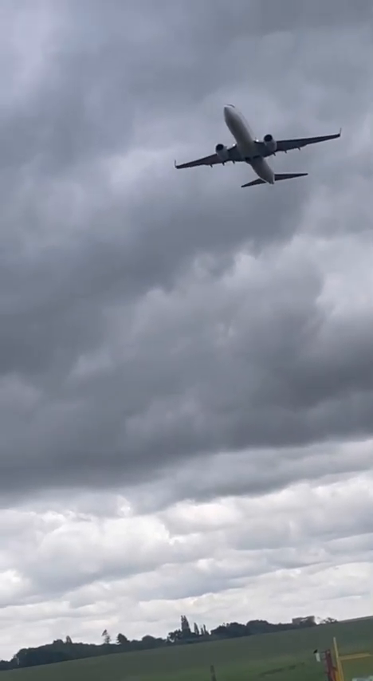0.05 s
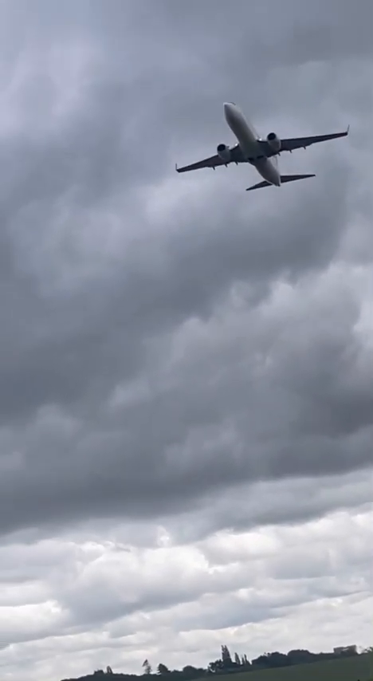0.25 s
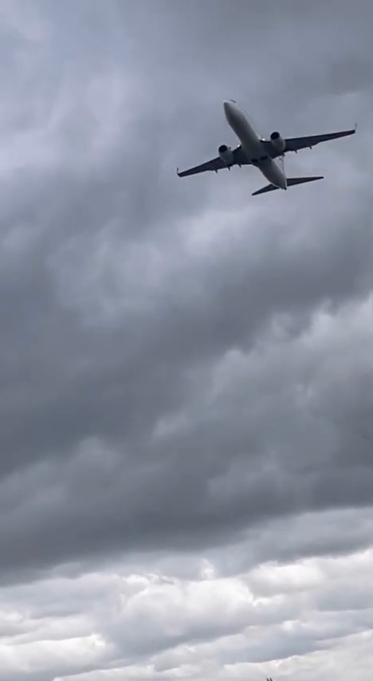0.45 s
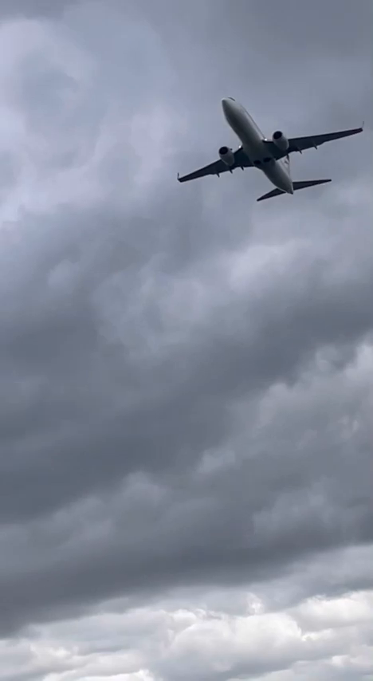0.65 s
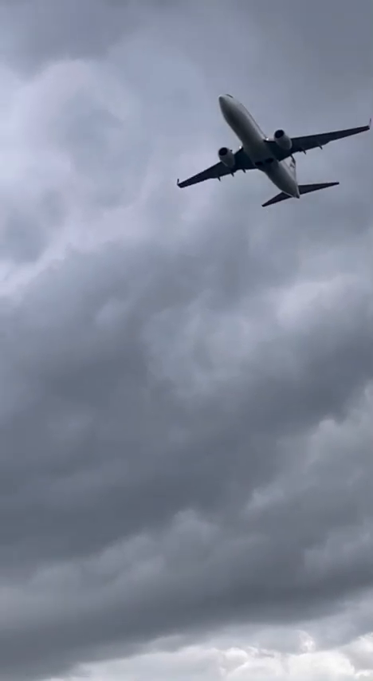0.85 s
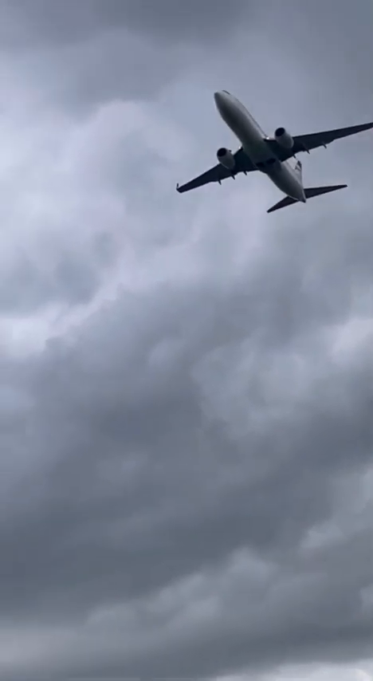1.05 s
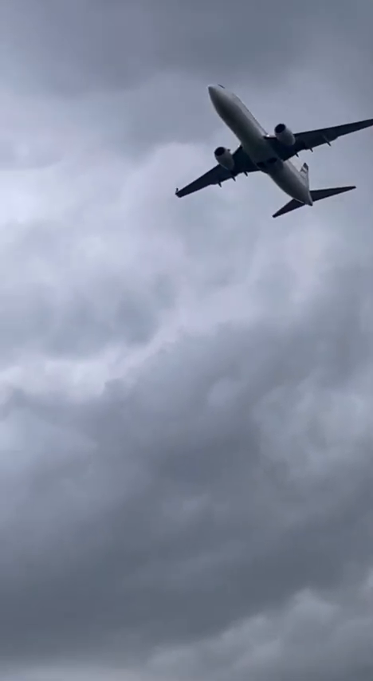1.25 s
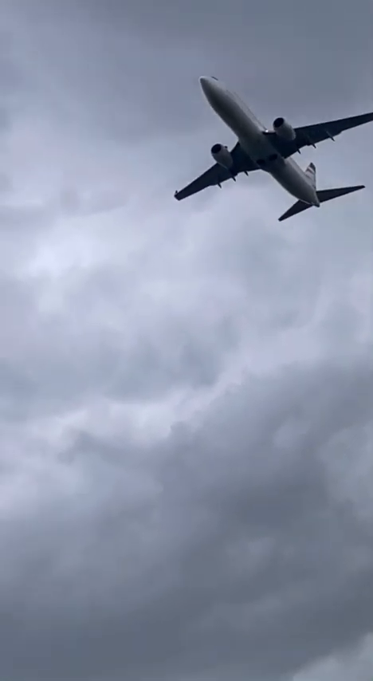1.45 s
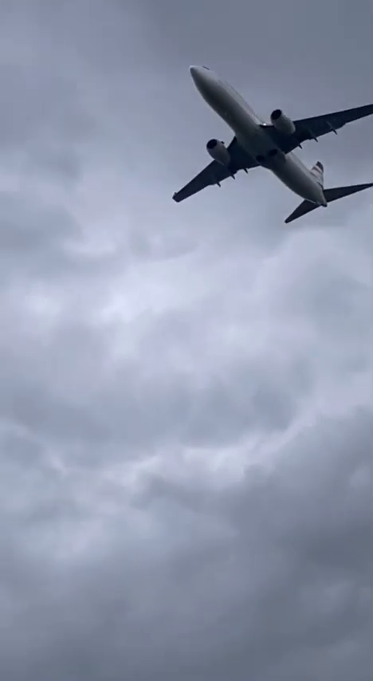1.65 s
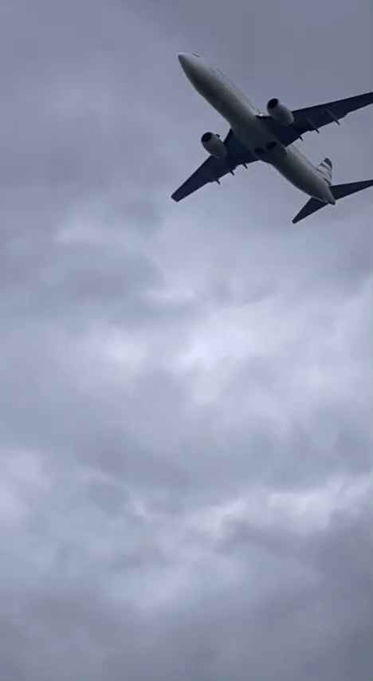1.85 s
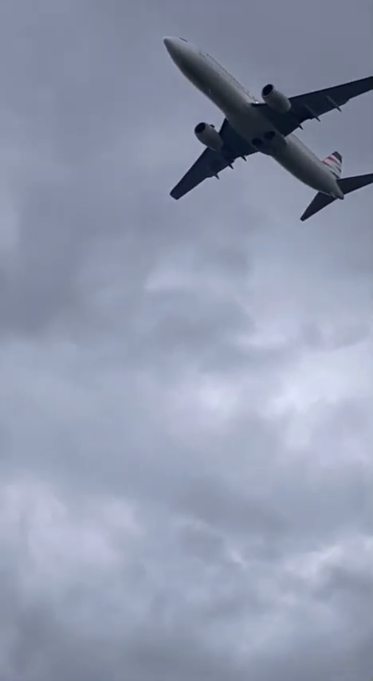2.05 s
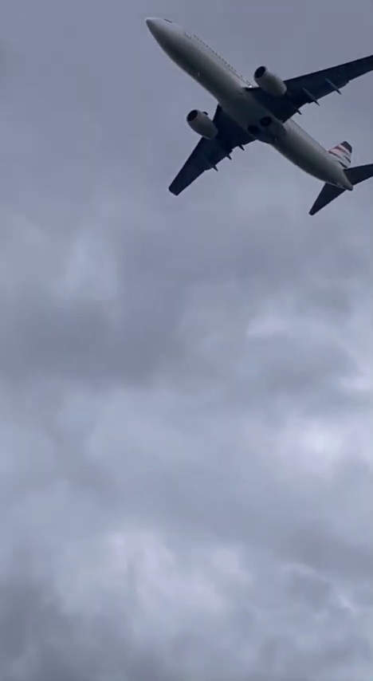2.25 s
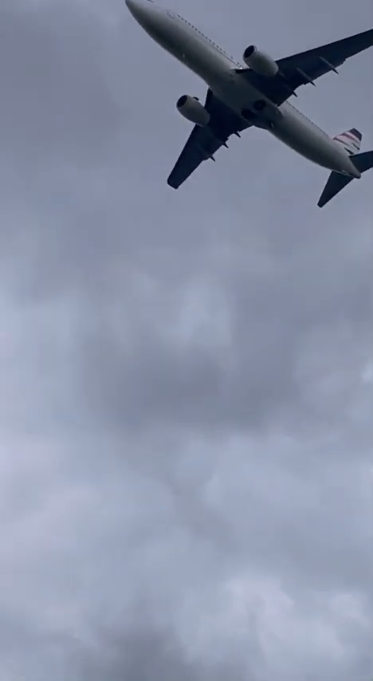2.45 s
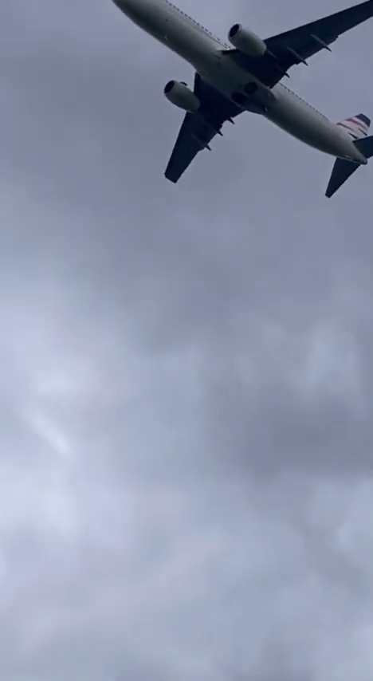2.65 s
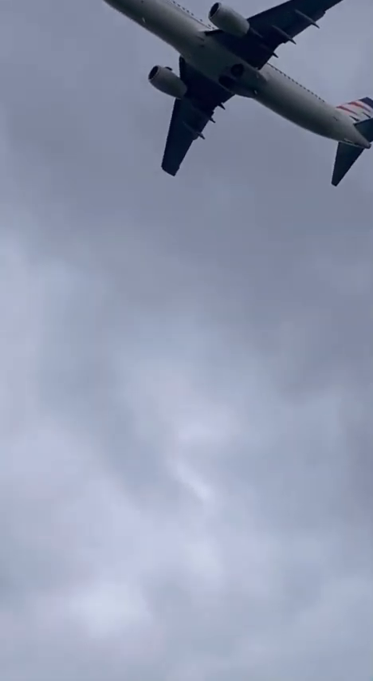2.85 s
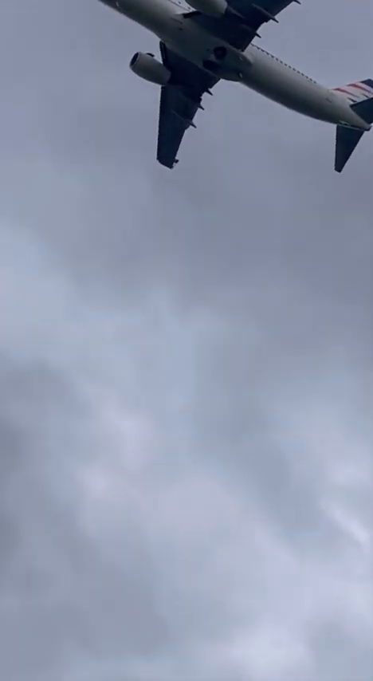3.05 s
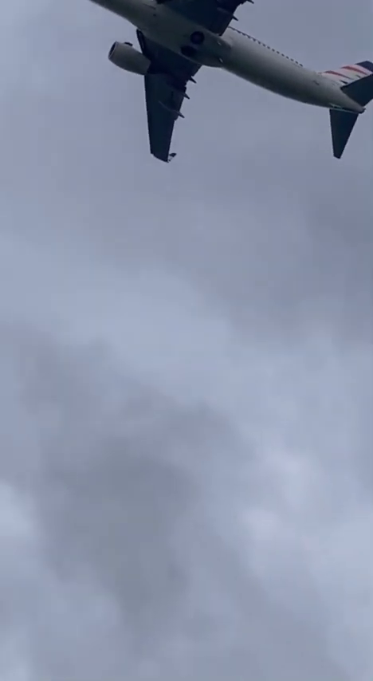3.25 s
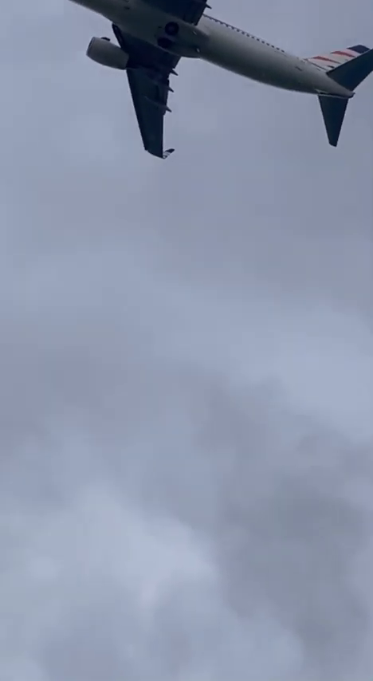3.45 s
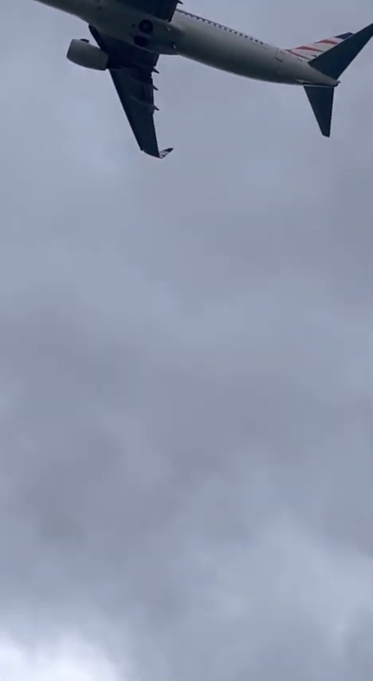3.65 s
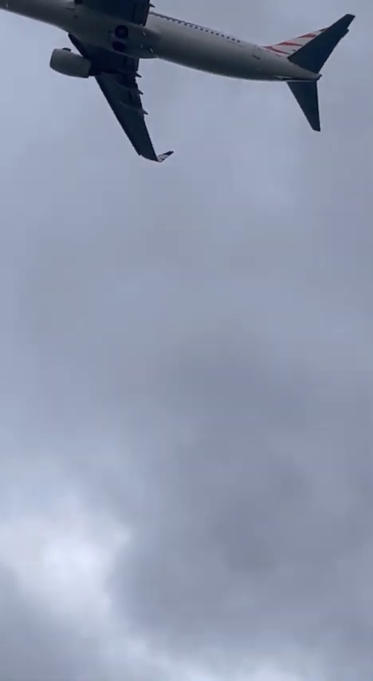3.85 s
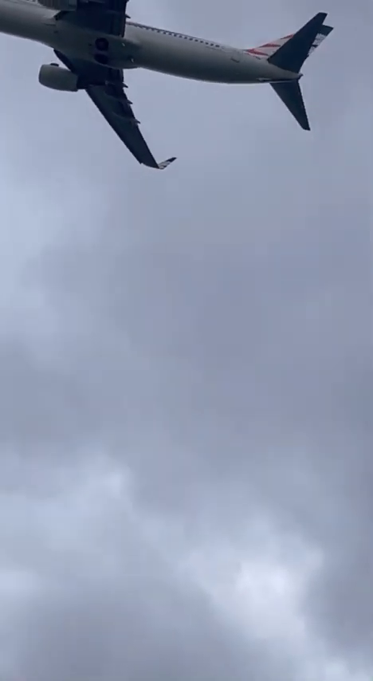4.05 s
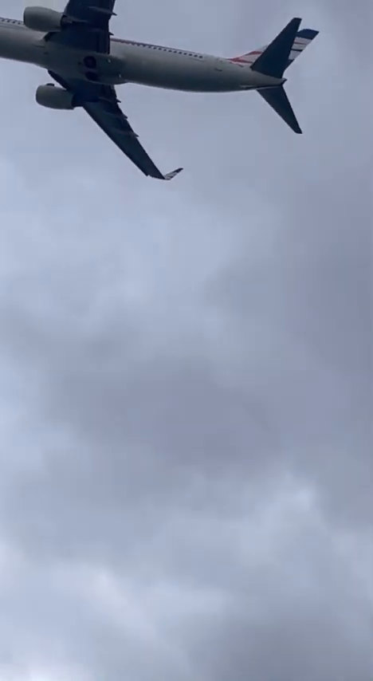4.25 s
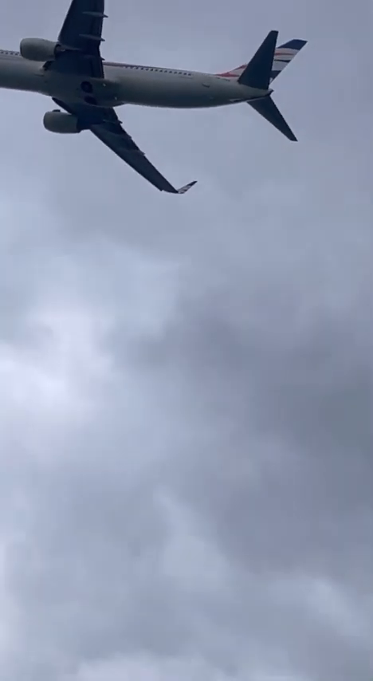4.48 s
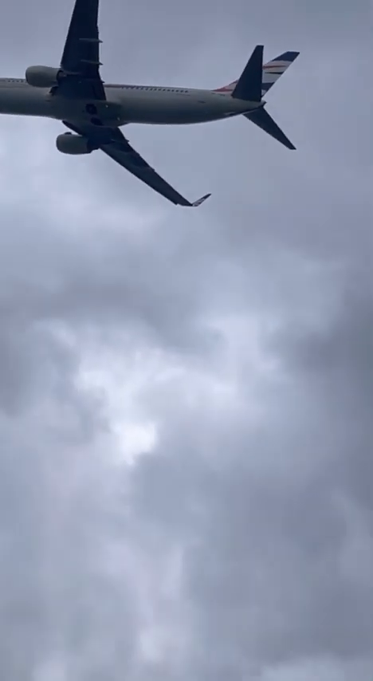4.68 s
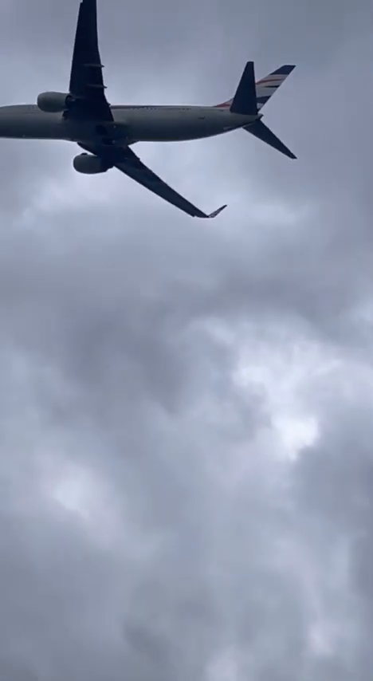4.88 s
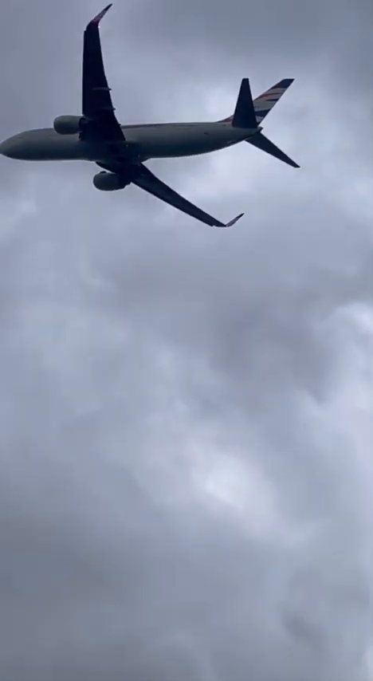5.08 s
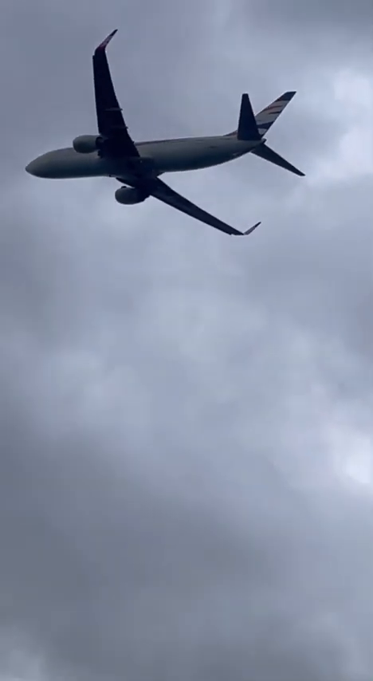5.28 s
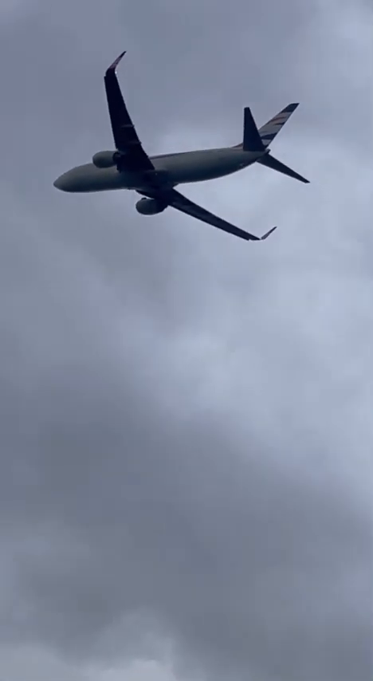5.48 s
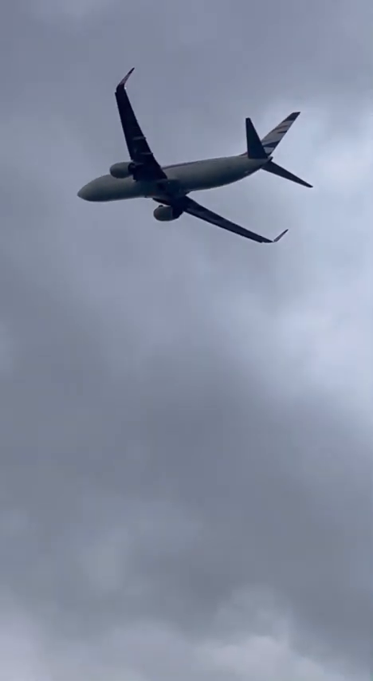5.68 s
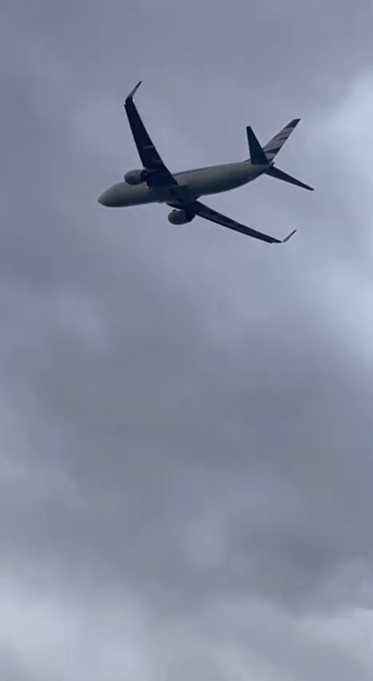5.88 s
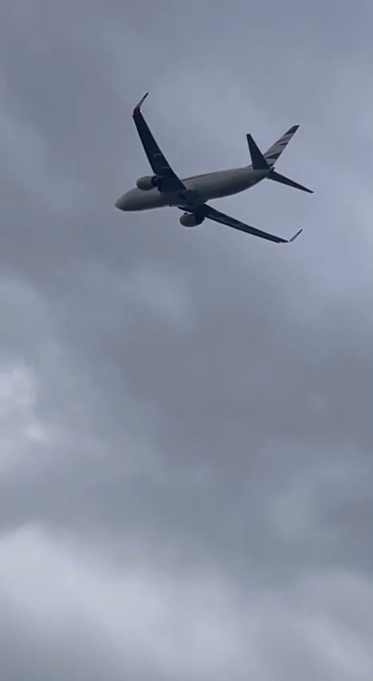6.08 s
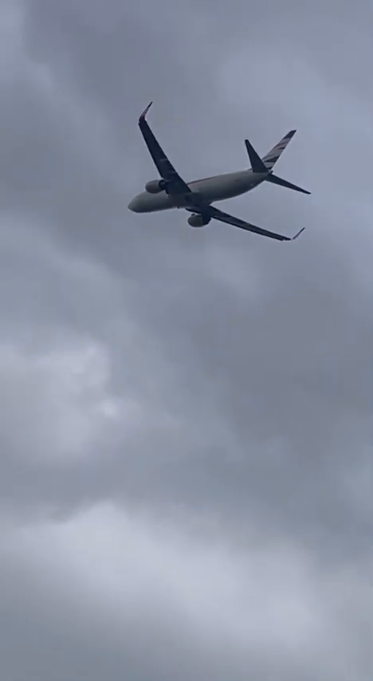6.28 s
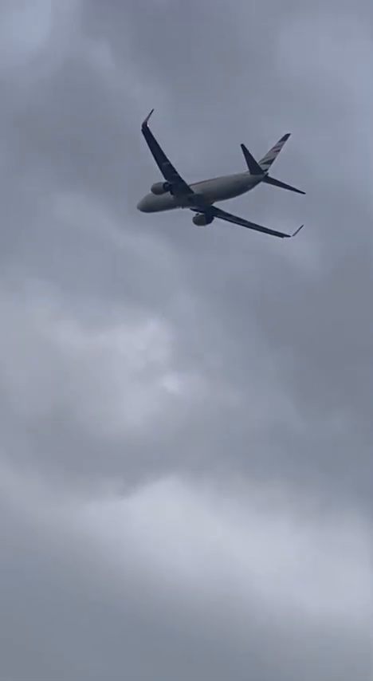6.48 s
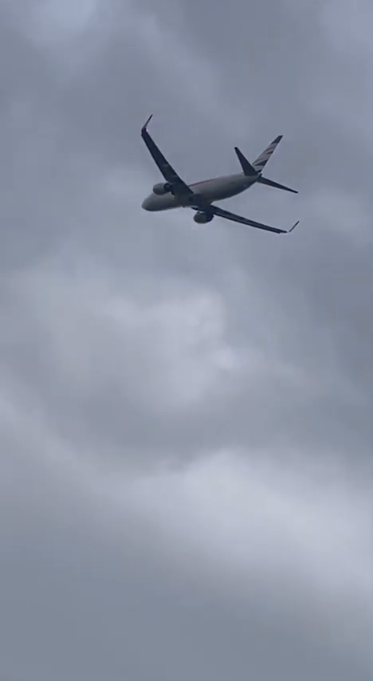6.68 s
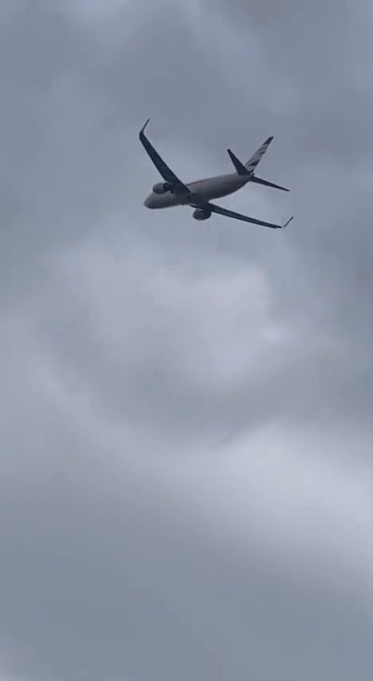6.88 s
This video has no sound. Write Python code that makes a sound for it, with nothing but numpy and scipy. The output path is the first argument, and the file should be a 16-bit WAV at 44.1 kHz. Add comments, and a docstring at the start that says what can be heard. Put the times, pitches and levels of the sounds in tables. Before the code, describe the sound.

Outdoors, a jet passes close above: raspy fan buzz and whine, then broad deepening roar and fluttering hiss, amid gusty wind thumps.

```python
"""Outdoors over grass: a twin-engine jet airliner climbs past low, heard by a small two-port microphone.
Fan tones (sines on shaft-speed multiples) fall in pitch as it passes; roar, rush and hiss are shaped noise.
The delayed ground echo sweeps a comb through the sound; turbulent air makes the treble swell and sink.
Wind noise buffets the ports, short thuds hit the microphone, two faint sliding whistles rise late on."""
import sys
import numpy as np
from scipy import signal
from scipy.fft import rfft, irfft, next_fast_len
from scipy.io import wavfile
from scipy.ndimage import uniform_filter1d, minimum_filter1d, map_coordinates

SR = 44100
rng = np.random.default_rng(int(sys.argv[2]) if len(sys.argv) > 2 else 0)


def unload_wav(signal):
    """Save mono or channel-first audio to the path in sys.argv[1] as 16-bit WAV at rate SR, clipped to [-1, 1]."""
    wavfile.write(
        sys.argv[1],
        SR,
        np.round(np.clip(np.atleast_2d(signal).T, -1, 1) * 32767).astype(np.int16),
    )


N = 305163
TIME_S = np.arange(N) / SR

# wind gusts on the ports: time_s, level_db
GUST_LEVEL = [(0, -35.5), (.36, -33.5), (1.17, -26.5), (1.45, -35), (2.09, -56), (2.5, -33.5), (3.1, -38.5),
              (3.47, -21.5), (4, -27.5), (4.4, -38.5), (5, -24), (5.3, -24), (5.76, -38), (6.07, -29),
              (6.92, -62.5)]
# wind spectrum: freq_hz, relative_density_db
WIND_SPECTRUM = [(30, -54), (70, -1.5), (130, -4), (250, -2.5), (500, -6), (900, -16), (2000, -67)]
# thuds of air on the microphone: middle_s, peak_db, pitch_hz, length_cycles
AIR_THUDS = [(.536, -14, 784, 3.8), (1.363, -11, 409, 5.8), (1.409, -5, 138, 0.76), (5.993, -17, 723, 5.6),
             (5.996, -10.5, 248, 2.1), (6.082, -10.5, 900, 0.89)]
# faint rising whistles: start_s, length_s, from_hz, to_hz, peak_db
RISING_CHIRPS = [(5.81, .075, 2500, 2980, -41), (5.845, .055, 3880, 4050, -47)]
# rumble: time_s, level_db
RUMBLE_LEVEL = [(0.0, -26), (0.91, -24.5), (1.0, -19), (1.39, -32.5), (1.43, -19), (1.58, -48), (1.87, -27),
                (2.73, -36.5), (3.79, -17), (4.57, -27), (4.66, -20.5), (5.74, -20.5), (6.09, -16.5),
                (6.21, -22.5), (6.42, -18), (6.47, -33.5), (6.71, -26.5), (6.92, -41.5)]
# rumble spectrum: freq_hz, relative_density_db
RUMBLE_SPECTRUM = [(15, -72), (30, -12.5), (45, -8.5), (65, 4), (85, 3.5), (110, -9.5), (150, -30),
                   (300, -92.5)]
# narrow hump of roar, sliding down: time_s, centre_hz, level_db
SLIDING_HUMP = [(1.2, 377, -41), (1.45, 340, -26.5), (1.6, 300, -21.5), (1.85, 270, -21), (2.05, 240, -24),
                (2.25, 215.4, -23.5), (2.5, 189.6, -24.5), (2.75, 170.3, -19.5), (2.95, 150, -19),
                (3.15, 140, -25), (3.5, 130, -42.5)]
# low middle of the roar: time_s, level_db
LOW_MIDDLE_LEVEL = [(0, -29.5), (.6, -31.5), (1, -27), (1.4, -26.5), (1.7, -22.5), (2.05, -22), (2.3, -36),
                    (2.5, -29), (2.62, -22.5), (2.9, -22), (3.08, -26), (3.22, -19.5), (3.6, -26.5),
                    (4, -23), (4.12, -31), (4.35, -20), (4.6, -25.5), (4.8, -23), (5.2, -27), (5.4, -24.5),
                    (5.5, -32), (5.65, -22), (5.82, -30.5), (6.2, -29.5), (6.5, -35.5), (6.92, -28)]
# low-middle spectrum: freq_hz, relative_density_db
LOW_MIDDLE_SPECTRUM = [(300, -36), (480, 3.5), (600, 1), (800, -2), (950, -17), (1500, -70.5)]
# exhaust roar: time_s, level_db
ROAR_LEVEL = [(0, -26.5), (.2, -23.5), (.63, -27), (1, -19), (1.3, -21.5), (1.56, -19), (1.87, -15.5),
              (2.14, -17), (2.41, -21), (2.75, -15.5), (3.4, -15), (3.55, -17), (3.72, -13), (3.9, -18),
              (4.35, -14), (4.9, -14.5), (5.05, -18.5), (5.65, -14.5), (5.8, -17), (6.2, -16.5), (6.6, -20),
              (6.92, -20.5)]
# roar spectrum before tilt: freq_hz, relative_density_db
ROAR_SPECTRUM = [(30, -50), (60, -12.5), (90, -2), (140, 4), (250, -0.5), (400, -2), (550, -12),
                 (800, -21.5), (1100, -46), (2000, -86.5)]
# fan rush, swelling and sinking in turbulent air: time_s, level_db
RUSH_LEVEL = [(0, -27.5), (.23, -29), (.4, -27.5), (.63, -29), (.94, -24), (1.39, -27), (1.66, -21.5),
              (1.87, -22), (2.1, -26.5), (2.47, -25), (2.68, -19), (2.75, -23), (3.01, -23.5), (3.08, -23),
              (3.29, -23.5), (3.45, -27), (3.57, -24), (3.85, -27), (4, -26), (4.21, -29), (4.29, -20.5),
              (4.44, -21.5), (4.47, -27.5), (4.55, -27.5), (4.58, -24), (4.65, -25.5), (4.8, -25),
              (4.89, -23), (4.95, -23.5), (4.98, -30), (5.04, -30.5), (5.11, -24.5), (5.18, -30.5),
              (5.24, -24), (5.3, -26), (5.4, -22), (5.44, -28), (5.53, -32), (5.58, -25.5), (5.7, -29),
              (5.86, -33.5), (6.08, -34), (6.17, -29.5), (6.23, -34), (6.44, -31), (6.59, -36.5),
              (6.76, -32.5), (6.92, -34.5)]
# rush spectrum: freq_hz, relative_density_db
RUSH_SPECTRUM = [(300, -50.5), (600, -3), (800, -5.5), (1000, 1.5), (1500, -1), (2000, -5), (2500, -4),
                 (3000, -11), (3800, -31.5), (6000, -81.5)]
# hiss: time_s, level_over_rush_db
HISS_OVER_RUSH = [(0, -13.5), (1, -11), (2, -9), (3, -9.5), (4, -10), (5, -9), (6, -9), (6.92, -10)]
# hiss spectrum before tilt: freq_hz, relative_density_db
HISS_SPECTRUM = [(1500, -52.5), (2600, -2.5), (3200, 4), (4000, 1.5), (5000, -1), (6000, -8.5), (7000, -11),
                 (8000, -22), (9000, -28), (10000, -32), (11000, -48.5), (12300, -50.5)]
# blade tone, in bursts as eddies cross the path: time_s, level_db
BLADE_TONE_LEVEL = [(0, -43.5), (.08, -45), (.17, -34), (.26, -42), (.35, -36), (.44, -45), (.55, -42),
                    (.64, -41), (.73, -33), (.8, -43), (.87, -35), (.91, -44), (.95, -31), (1.0, -39),
                    (1.05, -37), (1.07, -41), (1.13, -30.5), (1.17, -42), (1.22, -43), (1.265, -27),
                    (1.305, -26), (1.33, -41), (1.44, -43), (1.475, -26.5), (1.5, -25), (1.54, -28),
                    (1.58, -21), (1.61, -27.5), (1.65, -33), (1.69, -26), (1.74, -25.5), (1.77, -34),
                    (1.815, -28), (1.85, -37), (1.875, -19), (1.91, -30.5), (1.95, -38), (2.02, -32),
                    (2.12, -38), (2.19, -33), (2.24, -23), (2.28, -38), (2.3, -31), (2.39, -35),
                    (2.45, -29), (2.52, -38), (2.57, -22), (2.62, -29), (2.65, -21.5), (2.675, -30),
                    (2.7, -19.5), (2.725, -26), (2.745, -40), (2.78, -22.5), (2.81, -27.5), (2.845, -33),
                    (2.875, -26), (2.91, -34), (3, -40), (3.07, -37), (3.3, -44), (3.8, -45), (4, -37),
                    (4.1, -48), (4.25, -39), (4.35, -28), (4.45, -35), (4.5, -40), (5.1, -41), (5.56, -45),
                    (5.6, -32), (5.63, -31.5), (5.66, -47), (6.23, -50), (6.255, -33), (6.305, -34),
                    (6.33, -52.5), (6.92, -53.5)]
# blade tone octave: time_s, level_over_rush_db
OCTAVE_OVER_RUSH = [(0, -34.5), (1.3, -33), (1.6, -33.5), (2.55, -25), (3.2, -44.5), (3.92, -21.5),
                    (4.05, -33), (4.239, -30), (4.32, -14), (4.5, -26), (4.9, -22), (5.48, -31), (5.6, -18),
                    (5.8, -31), (6.27, -25), (6.92, -20)]
# blade tone third harmonic, from the nozzle: time_s, level_over_rush_db
THIRD_OVER_RUSH = [(4.1, -50), (5.179, -44), (5.25, -19), (5.42, -20), (5.46, -40), (5.6, -18),
                   (5.8, -44.5)]
# buzz-saw, heard from ahead of the intakes: time_s, level_over_rush_db
BUZZ_OVER_RUSH = [(0, -3.5), (.9, -8), (1.3, -4.5), (1.55, -2.5), (1.95, -1.5), (2.3, -5), (2.9, -10.5),
                  (3.06, -1), (3.3, -11), (3.57, -8), (3.8, -16), (4.3, -41.5)]
# buzz-saw lines from uneven blade shocks: shaft_multiple, relative_level_db
BUZZ_LINES = [(8, -6), (9, -2.5), (10, -14), (11, -5), (12, -2), (13, -5), (14, 1.5), (15, -1), (16, 0.5),
              (17, -1), (18, -5), (19, -1), (20, -14.5), (21, -4.5), (22, -12.5), (23, -11.5), (25, -19),
              (26, -14.5), (27, -12), (28, -7.5), (29, -19.5), (30, -5.5), (31, -20.5), (32, -17.5),
              (33, -13), (34, -20), (35, -17), (36, -11.5), (38, -17.5), (40, -19), (41, -15), (42, -22.5)]
# buzz-saw lines standing out for a while: shaft_multiple, middle_s, length_s, level_db
BUZZ_FLARES = [(9, 1.58, 0.31, -30.5), (12, 1.54, 0.41, -33.5), (14, 1.03, 0.45, -33.5),
               (14, 1.68, 0.22, -25), (15, 0.95, 0.35, -32), (16, 0.93, 0.28, -36.5),
               (13, 1.35, 0.28, -37.5), (13, 1.83, 0.27, -34), (15, 2.1, 0.28, -32), (16, 1.71, 0.25, -33),
               (17, 1.8, .3, -34.5), (19, 1.52, 0.13, -34), (12, 1.76, 0.18, -31), (27, 1.75, .3, -38),
               (19, 1.8, .2, -38), (21, 1.7, 0.16, -31), (18, 2.3, 0.15, -37), (14, 2.55, 0.22, -33),
               (27, 2.2, 0.14, -39), (15, 2.65, 0.1, -30), (16, 3.7, 0.27, -37.5), (33, 1.68, 0.22, -40.5),
               (20, 1.72, 0.18, -37), (28, 1.75, .2, -44), (28, 3.6, .13, -33), (21, 3.58, 0.22, -37),
               (32, 3.4, 0.08, -40), (12, 3.08, .1, -39), (14, 3.08, 0.092, -35), (15, 3.08, .11, -29),
               (16, 3.08, .11, -31), (19, 3.08, .12, -34), (21, 3.8, 0.15, -34), (26, 3.08, .1, -38.5),
               (30, 3.08, .1, -40), (21, 3.22, 0.17, -36), (28, 3.8, .1, -33), (19, 2.86, 0.12, -38.5),
               (28, 2.86, .12, -34), (36, 2.87, .1, -40), (16, 2.84, 0.12, -35), (26, 2.62, .14, -39),
               (36, 2.56, 0.088, -41), (11, 0.75, 0.11, -35), (21, 0.75, 0.12, -40), (18, .9, 0.17, -36),
               (19, 2.15, .15, -38), (17, 1.5, 0.21, -39), (21, 1.4, 0.089, -31)]
# echo off the grass: time_s, strength_0_to_1
GROUND_STRENGTH = [(0, 0.4), (.6, 0), (1.2, 0.26), (1.55, 0.75), (2.2, 0.8), (2.7, 0.66), (3.2, 0.68),
                   (4.1, 0.5), (5, 0.77), (6, 0.53), (6.92, .9)]
# the two ports: freq_hz, left_lead_rad, left_minus_right_db, unrelated_share_db
PORT_RESPONSE = [(100, 0, 0, -28), (500, -.05, 0, -18), (1030, .15, 2.8, -14), (1720, .1, -1.5, -12),
                 (2400, .75, -.2, -14), (3100, .75, 0, -14), (3800, .6, 0, -11), (4600, .9, 0, -11),
                 (4750, 0, 0, -60), (5400, 0, 0, -60), (5550, .7, 0, -11), (5850, 1, 0, -10),
                 (6550, 2.1, 0, -10), (6850, 2.6, 0, -12), (7000, np.pi, 0, -60), (8250, np.pi, 0, -60),
                 (8400, 3.8, 0, -7), (9300, 4.7, 0, -5), (10000, 5.6, 0, -8), (10300, 2 * np.pi, 0, -60)]

# straight climb past the microphone; ABEAM_S is source time, heard later by the travel time
SPEED_M_S, CLIMB_RAD = 87.0, .125
ABEAM_S, HEIGHT_M, ASIDE_M = 3.876, 138.8, 80.8
EAR_M, SOUND_M_S = 1.572, 343
BLADES, BLADE_HZ = 24, 1908  # blade-passing pitch at the engine
SECOND_SLOWER = .006  # second engine's speed deficit, as a share
SMEAR_RAD = .011  # phase scatter per multiple of shaft speed
BEHIND_DB = 1.5  # the roar deepens once heard from behind
# hiss tilt at twice the pivot: least loss near abeam, more on long slant paths, more so ahead
ABEAM_DB, SLANT_DB, AHEAD_DB = -7, 19.5, 3.5
HISS_SWINGS = .23  # hiss swings wider than the rush by this share
HUMP_WIDTH_HZ = 65  # centre to 1/e
TOP_HZ = 12360


def amp(db):
    """Decibels to gain."""
    return 10 ** (np.asarray(db) / 20)


def unit(x):
    """Scaled to rms 1."""
    return x / np.sqrt(np.mean(x ** 2) + 1e-20)


def along(points, hz):
    """Each column after the frequency, read on a log axis."""
    f, *cols = np.transpose(points)
    return [np.interp(np.log(hz + 1), np.log(f + 1), c) for c in cols]


def curves(rows, t=TIME_S):
    """Each column after the time, read at times t."""
    s, *cols = np.transpose(rows)
    return [np.interp(t, s, c) for c in cols]


def wobble(rate_hz):
    """Smooth random curve, rate_hz knots a second."""
    coarse_s = TIME_S[::32]
    knots = rng.standard_normal(int(N * rate_hz / SR) + 4)
    return np.interp(TIME_S, coarse_s, map_coordinates(knots, [coarse_s * rate_hz]))


def filtered(x, response):
    """x times a complex response of frequency."""
    m = next_fast_len(N + SR // 2)
    return irfft(rfft(x, m) * response(np.fft.rfftfreq(m, 1 / SR)), m)[..., :N]


def noise(spectrum, patchy_db, loss=None, pivot_hz=None):
    """Coloured noise of rms 1 with patches of random gain, tilted in time about a pivot."""
    hz, t, z = signal.stft(rng.standard_normal(N), SR, nperseg=1024)
    patches = uniform_filter1d(rng.standard_normal(z.shape), size=14, axis=0)
    patches = uniform_filter1d(patches, size=5, axis=1)
    gain = amp(along(spectrum, hz)[0])[:, None] * np.ones(len(t))
    if loss is not None:
        octave_tilt = np.minimum(hz[:, None] / pivot_hz, 4) - 1
        gain = gain * amp(-curves(loss, t)[0] * octave_tilt)
    gain = gain / np.sqrt(np.mean(gain ** 2, axis=0))  # tilt leaves the level alone
    shaped = z * gain * amp(patchy_db * unit(patches))
    return unit(signal.istft(shaped, SR, nperseg=1024)[1][:N])


def wind():
    """Lumpy pressure, unrelated from port to port, under shared gusts."""
    lumps = amp(2.8 * np.array([wobble(24), wobble(14)]))
    pair = np.array([noise(WIND_SPECTRUM, patchy_db=2.0), noise(WIND_SPECTRUM, patchy_db=3.5)])
    gusts_db = curves(GUST_LEVEL)[0] + 3.3 * wobble(6)
    return amp(gusts_db) * unit(lumps * pair)


def thuds():
    """Each thud is a few cycles under a bell-shaped swell."""
    out = np.zeros(N)
    for middle_s, peak_db, hz, cycles in AIR_THUDS:
        t = TIME_S - middle_s
        bell = np.exp(-(2 * hz * t / cycles) ** 2)
        out += amp(peak_db) * bell * np.cos(2 * np.pi * hz * t)
    return out


def chirps():
    """Short thin whistles that slide upward in pitch."""
    out = np.zeros(N)
    for start_s, length_s, from_hz, to_hz, peak_db in RISING_CHIRPS:
        u = np.clip((TIME_S - start_s) / length_s, 0, 1)
        cycles = length_s * (from_hz * u + (to_hz - from_hz) * u ** 2 / 2)
        out += amp(peak_db) * np.sin(np.pi * u) * np.sin(2 * np.pi * cycles)
    return out


def rumble():
    """Deep noise of uneven level."""
    level_db = curves(RUMBLE_LEVEL)[0] + .6 * wobble(9)
    return amp(level_db) * noise(RUMBLE_SPECTRUM, patchy_db=1.5)


def hump():
    """Slow noise carried on two quadrature tones: a band around a sliding centre."""
    centre_hz, level_db = curves(SLIDING_HUMP)
    slow = filtered(rng.standard_normal((2, N)), lambda hz: np.exp(-(hz / HUMP_WIDTH_HZ) ** 2))
    turn = 2 * np.pi * np.cumsum(centre_hz) / SR
    return amp(level_db) * unit(slow[0] * np.cos(turn) + slow[1] * np.sin(turn))


def flight():
    """At each moment of hearing: ground detour in m, pitch factor, cosine of the angle off the tail."""
    sent_s = np.linspace(-8, 8, num=4000)
    ahead = SPEED_M_S * sent_s * np.cos(CLIMB_RAD)
    high = HEIGHT_M + SPEED_M_S * sent_s * np.sin(CLIMB_RAD)
    direct = np.sqrt(ahead ** 2 + ASIDE_M ** 2 + high ** 2)
    bounced = np.sqrt(ahead ** 2 + ASIDE_M ** 2 + (high + 2 * EAR_M) ** 2)
    arrives_s = ABEAM_S + sent_s + direct / SOUND_M_S
    pitch = 1 / np.gradient(arrives_s, sent_s)  # Doppler
    tail_cos = np.gradient(direct, sent_s) / SPEED_M_S
    return [np.interp(TIME_S, arrives_s, v) for v in (bounced - direct, pitch, tail_cos)]


def low_middle():
    """Patchy noise filling the low middle of the roar."""
    level_db = curves(LOW_MIDDLE_LEVEL)[0] + .9 * wobble(12)
    return amp(level_db) * noise(LOW_MIDDLE_SPECTRUM, patchy_db=2.0)


def exhaust_roar():
    """Jet noise whose balance deepens as the view turns to the tail."""
    deepening = np.c_[TIME_S, BEHIND_DB * flight()[2]]
    level_db = curves(ROAR_LEVEL)[0] + .73 * wobble(9)
    return amp(level_db) * noise(ROAR_SPECTRUM, patchy_db=.87, loss=deepening, pivot_hz=251)


def rush_and_hiss():
    """Fan noise in two bands, both fluttered by eddies; the slant path dulls the hiss."""
    tail_cos = flight()[2]
    rush_db, = curves(RUSH_LEVEL)
    flutter = wobble(14)
    rush = amp(rush_db + .45 * flutter) * noise(RUSH_SPECTRUM, patchy_db=1.3)
    swing_db = rush_db - uniform_filter1d(rush_db, size=SR // 2)
    hiss_db = rush_db + HISS_SWINGS * swing_db + curves(HISS_OVER_RUSH)[0] + .47 * flutter
    air = np.c_[TIME_S, ABEAM_DB + SLANT_DB * tail_cos ** 2 - AHEAD_DB * tail_cos]
    return rush + amp(hiss_db) * noise(HISS_SPECTRUM, patchy_db=1.5, loss=air, pivot_hz=4500)


def fan_line(order, fade_db, flutter_db):
    """Sine on a multiple of Doppler-shifted shaft speed, fading on its own; eddies smear high lines most."""
    shaft = 2 * np.pi * np.cumsum(BLADE_HZ * flight()[1] / BLADES) / SR
    drift = 1.2 * wobble(6) + .51 * wobble(30) + SMEAR_RAD * order * wobble(90)
    level = amp(fade_db * wobble(8) + flutter_db * wobble(21.95))
    return np.sqrt(2) * level * np.sin(order * shaft + drift)


def engine_pair(order, level_db, second, fade_db, flutter_db):
    """One tone from both engines; slightly unequal speeds make it beat."""
    first_line = fan_line(order, fade_db, flutter_db)
    second_line = fan_line(order * (1 - SECOND_SLOWER), fade_db, flutter_db)
    return amp(level_db) * (first_line + second * second_line)


def buzz_saw():
    """Comb of shaft multiples from uneven blade shocks, plus lines that flare briefly."""
    lines = sum(amp(db) * fan_line(k, fade_db=1.8, flutter_db=3.5) for k, db in BUZZ_LINES)
    out = amp(curves(RUSH_LEVEL)[0] + curves(BUZZ_OVER_RUSH)[0]) * unit(lines)
    for order, middle_s, length_s, db in BUZZ_FLARES:
        window = np.exp(-(2 * (TIME_S - middle_s) / length_s) ** 4)
        out += amp(db) * window * fan_line(round(order), fade_db=.7, flutter_db=2.2)
    return out


def blade_tones():
    """Blade-passing tone of both fans with its second and third harmonics."""
    out = engine_pair(BLADES, curves(BLADE_TONE_LEVEL)[0], second=.2, fade_db=.1, flutter_db=.7)
    rush_db, = curves(RUSH_LEVEL)
    for harmonic, rows in [(2, OCTAVE_OVER_RUSH), (3, THIRD_OVER_RUSH)]:
        level_db = rush_db + curves(rows)[0]
        out += engine_pair(harmonic * BLADES, level_db, second=.6, fade_db=2.0, flutter_db=3.0)
    return out


def with_ground(x):
    """Adds the duller copy off the grass, late by the detour."""
    dull = filtered(x, lambda hz: 1 / (1 + (hz / 600) ** 2))
    echo = np.interp(TIME_S - flight()[0] / SOUND_M_S, TIME_S, dull)
    return x + np.clip(curves(GROUND_STRENGTH)[0], 0, 1) * echo


def ports(x):
    """Each port hears its own phase and colour, plus a scattered part of its own."""
    def response(hz):
        lead_rad, balance_db, _ = along(PORT_RESPONSE, hz)
        half = amp(balance_db / 2) * np.exp(.5j * lead_rad)
        return np.array([half, 1 / half])

    z = signal.stft(x, nperseg=512)[2]
    scrambled = z * np.exp(2j * np.pi * rng.random((2, *z.shape)))
    loose = 1.41 * signal.istft(scrambled, nperseg=512)[1][:, :N]  # makes up for scrambling loss
    return filtered(x, response) + filtered(loose, lambda hz: amp(along(PORT_RESPONSE, hz)[2]))


def scene():
    """The aircraft through ground and ports, with the wind."""
    aircraft = low_middle() + exhaust_roar() + rush_and_hiss() + buzz_saw() + blade_tones()
    return ports(with_ground(aircraft) + hump() + rumble() + thuds() + chirps()) + wind()


def record(dry):
    """The microphone drops the deepest bass, a limiter holds the peaks, a band limit cuts the top."""
    heard = filtered(dry, lambda hz: 1 / np.sqrt(1 + (42 / (hz + 1)) ** 6))
    needed = np.minimum(1, .9 / (np.abs(heard).max(axis=0) + 1e-9))
    gain = uniform_filter1d(minimum_filter1d(needed, size=441), size=441)
    return filtered(heard * gain, lambda hz: hz < TOP_HZ)


dry = scene()
out = record(dry)
unload_wav(out)
```